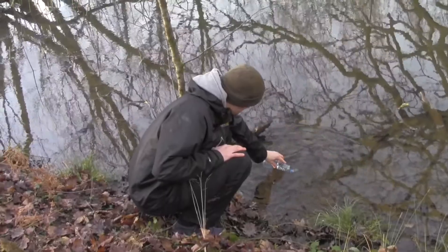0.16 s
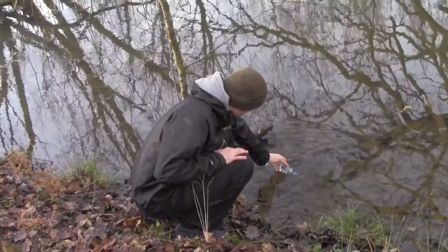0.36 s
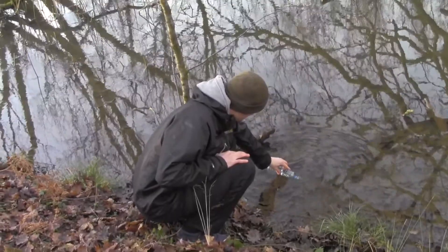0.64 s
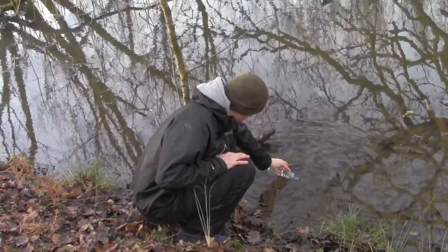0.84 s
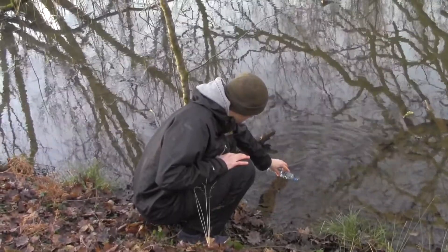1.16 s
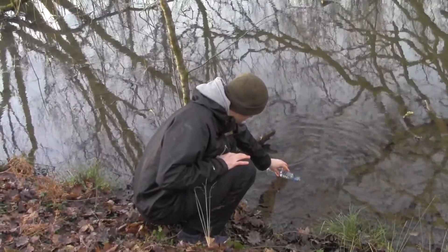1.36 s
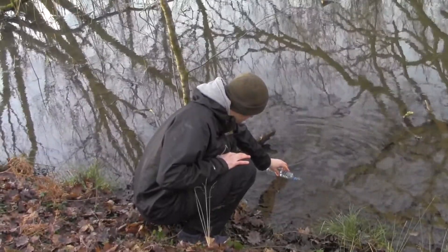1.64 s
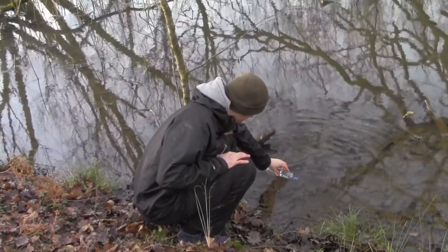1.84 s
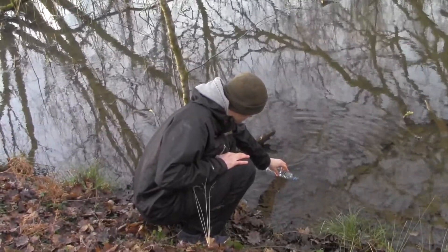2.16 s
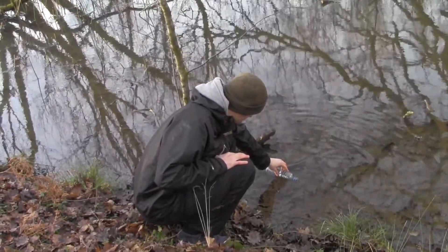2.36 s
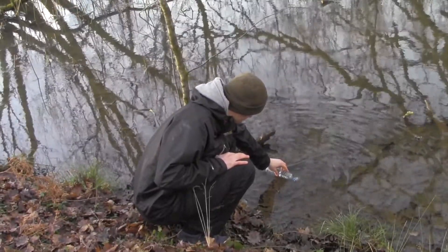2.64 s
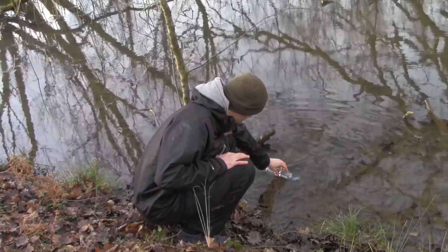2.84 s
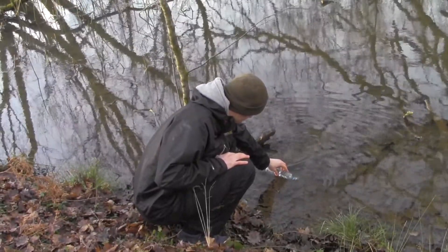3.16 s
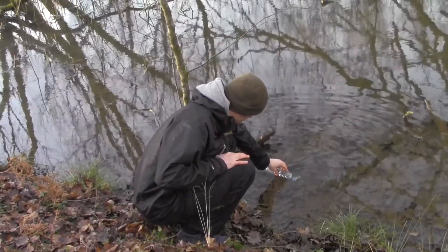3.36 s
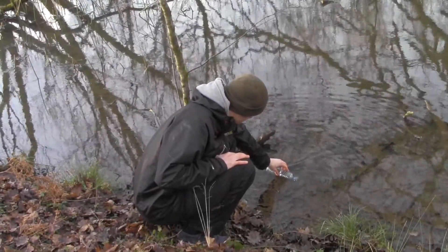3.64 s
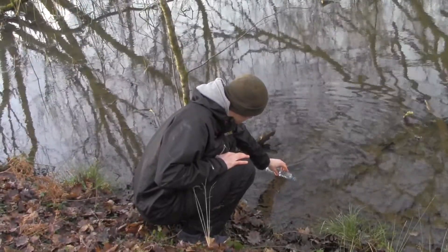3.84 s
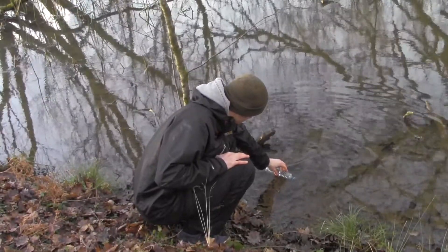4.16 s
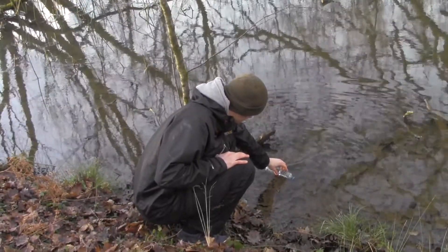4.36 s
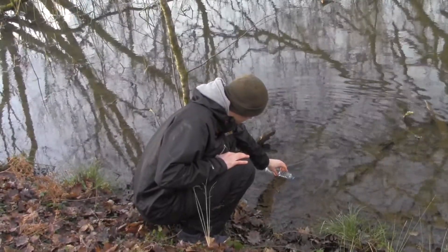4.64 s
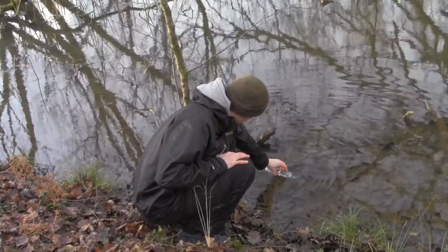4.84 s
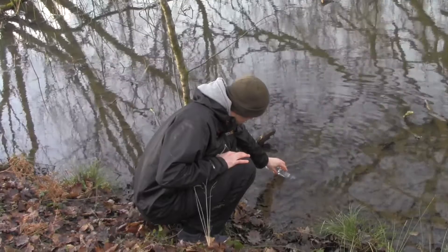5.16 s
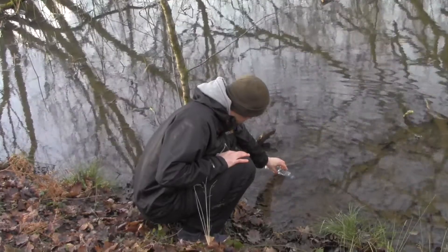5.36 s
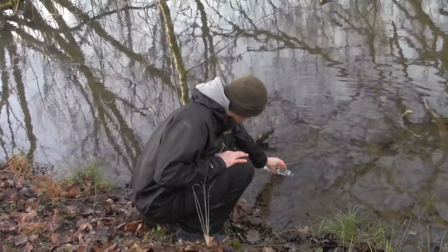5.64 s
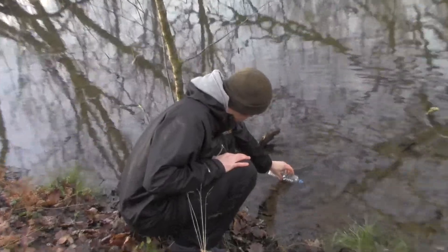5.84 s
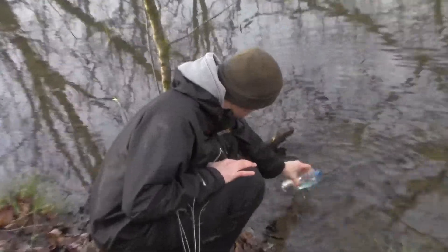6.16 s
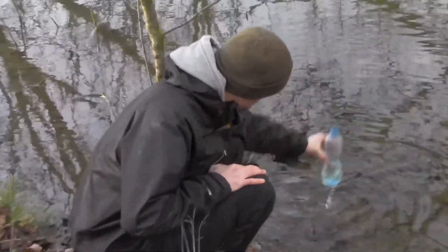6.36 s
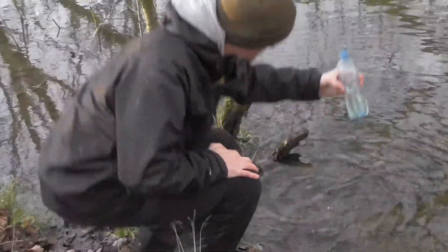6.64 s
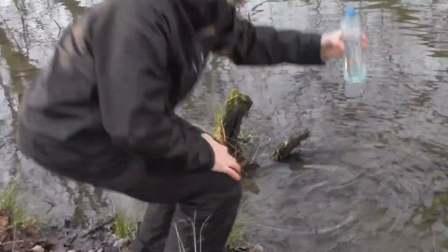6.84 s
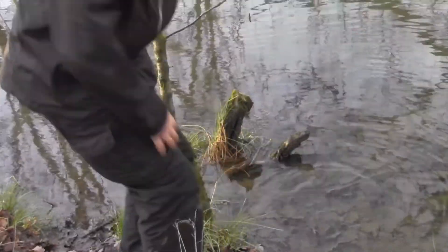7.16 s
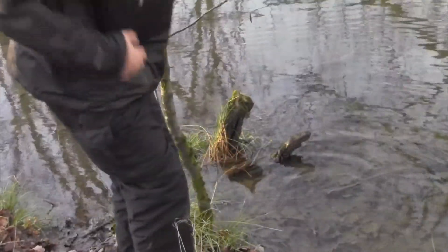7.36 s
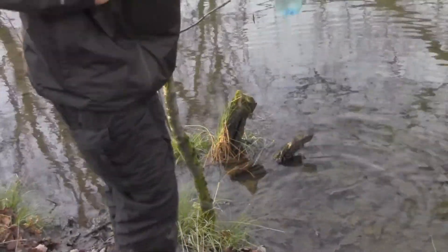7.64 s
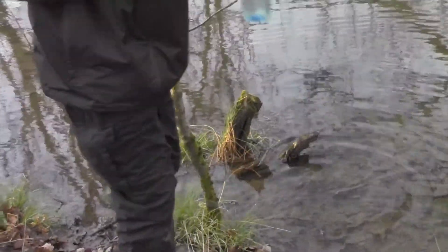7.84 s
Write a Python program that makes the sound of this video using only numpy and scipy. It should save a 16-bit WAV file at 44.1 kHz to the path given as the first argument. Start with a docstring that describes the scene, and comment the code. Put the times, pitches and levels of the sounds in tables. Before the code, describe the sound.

A quiet woodland pond outdoors, heard through an exposed stereo microphone over a faint, broad wash of distant air and traffic. From 0.3 to 1.1 seconds small dull wind puffs flutter on either side. A slight tick comes at 1.8, then more gusts from 2 to 2.7, with light nylon rustling and small ticks around 2.4. A brighter rustle and sharp ticks at 2.8 lead into heavy wind buffeting from 2.95 to 3.65, low, lumpy and booming. It stops quickly, with a brush of cloth at 3.75 and a small puff at 3.9. Calm follows, with sparse ticks, barely audible squeaks and weak thumps near 5.3 and 5.65. A faint plastic touch at 5.9 precedes a short bottle crackle and dent at 6.5. Clicks follow near 6.9. At 7.6 to 7.7 jacket fabric swishes around a crisp, bright snap, then the distant wash remains until 8.

```python
"""Wind buffets two microphone ports over a far wash of air and traffic; a nylon jacket rustles
and squeaks faintly, small things tick, and a plastic bottle crackles in the hand at a woodland pond.
Wind is shaped noise plus rounded pressure pops; the wash is noise in independently swelling bands.
Cloth and bottle are random slips through resonances; ticks are short rings; squeaks are gliding noise."""
import sys
import numpy as np
from scipy import signal
from scipy.io import wavfile
from scipy.ndimage import uniform_filter1d

SR = 44100
rng = np.random.default_rng(int(sys.argv[2]) if len(sys.argv) > 2 else 0)


def store_pcm(level_fs):
    """Save levels as 16-bit WAV."""
    pcm = np.round(np.clip(level_fs, -1, 1) * 32767).astype(np.int16)
    wavfile.write(sys.argv[1], SR, np.atleast_2d(pcm).T)


N = 352800

# Levels and sides in the tables are nominal, ahead of port mixing, filters and limiter.
# Running wind on the ports. Each row: time in seconds, level in dB, left minus right in dB,
# tilt in dB per octave.
BREEZE = [(0, -58, 0.5, 5), (.24, -57, 3, -20), (.6, -68, 6, -20), (.96, -72, 6, -6), (1.35, -66, 1.5, -12),
          (1.61, -57, 1.5, -11), (1.89, -64, 1.5, -12), (2.6, -72, -8, -15), (2.81, -62, -8, -20),
          (2.85, -39, -3, -16), (3.02, -21, -3, -9), (3.09, -14, -1.5, -10), (3.3, -12, -3, -7),
          (3.48, -18, -2.5, -3), (3.64, -28, .6, 4), (3.74, -50, .6, 5), (3.8, -90, 0, 3)]
# Short gusts. Each row: peak time in seconds, level in dB, rise in seconds per 20 dB,
# fall in seconds per 20 dB, left minus right in dB, tilt in dB per octave.
GUSTS = [(.322, -34, .035, .09, -3, -20), (.54, -45, .08, .08, 7, -26), (.736, -37, .04, .07, -10.5, -20),
         (.9, -51, .05, .06, 6, -20), (1.07, -58, .04, .06, 7, -12), (1.96, -46, .05, .06, 9, -22),
         (2.05, -33, .06, .12, -3, -17.5), (2.3, -37, .02, .15, -15, -11), (2.46, -22, .06, .066, -8, -2.5),
         (2.62, -35, .015, .09, -5, -13), (2.73, -38, .1, .04, -6, -14), (2.986, -11, .045, .04, 3, 1.5),
         (3.8, -40, .04, .03, .6, -2.5), (3.91, -27, .012, .045, .6, 4), (4.98, -61, .03, .05, .6, -9),
         (5.277, -46, .04, .04, .6, -3), (5.317, -32, .025, .07, .6, -6), (5.45, -52, .06, .1, .6, -1.5),
         (5.65, -31, .012, .05, .6, -8)]
# Further eddies popping on a port. Each row: start in seconds, pop level in dB,
# left minus right in dB, edge level in dB.
EDDY_POPS = [(0.472, -32, 19, -64), (2.017, -31, 20, -61), (2.335, -33.5, -18, -58), (2.445, -24, -9, -31),
             (2.968, -14, 14, -17), (3.048, -7, 6, -40), (3.095, -2.5, 1.5, -30), (3.132, -7, 14, -11),
             (3.174, .6, -3, -12), (3.276, .6, 10, 1.5), (3.295, .6, 10, -5), (3.313, .6, 5, -9),
             (3.372, -5, 0, -30), (3.425, -11, 16, -12), (3.458, -12, 22, -18), (3.474, -8, 0, -35),
             (3.524, -3, 5, -9), (3.548, -7, -3, -26), (3.56, -9, 0, -30), (3.583, -14, 0, -35),
             (3.622, -4, 3, -16), (5.366, -27, .6, -56)]
# Turbulence spectrum before tilt. Each row: frequency in Hz, density in dB per Hz.
EDDY_SPECTRUM = [(25, -38), (60, -25), (110, 6), (200, 11), (350, 5), (550, -27), (800, -68), (1300, -71)]
# Stereo width of the wind. Each row: time in seconds, gain of the side signal in dB.
WIND_WIDTH = [(0, -18), (.2, -12), (.28, 1.5), (1.1, -1.5), (1.35, -16), (1.85, -14), (1.93, 1.5),
              (3.47, .6), (3.62, -20), (3.9, -40), (8, -38)]
# Far wash. Each row: time in seconds, level in dB.
WASH_LEVEL = [(0, -64), (1.2, -65), (1.56, -60.5), (2.38, -59.5), (2.8, -53), (3.3, -55), (3.9, -54),
              (4.3, -55), (4.86, -58.5), (5.3, -56), (6.3, -55.5), (7.22, -55.5), (8, -52.5)]
# Wash spectrum. Each row: frequency in Hz, density in dB per Hz.
WASH_SPECTRUM = [(60, -26), (201, -16), (380, -8), (627, -10.5), (810, -1), (953, 1), (1260, 4),
                 (2100, -5.5), (3000, -16), (4320, -22.5), (13200, -33), (15500, -40)]
# Gain of the wash bands below 700 Hz. Each row: time in seconds, gain in dB.
WASH_BODY = [(4.8, -2), (5.4, 3)]
# Jacket strokes. Each row: peak time in seconds, level in dB, rise in seconds per 20 dB,
# fall in seconds per 20 dB, top end against the rest in dB.
STROKES = [(1.5, -63.5, .15, .6, -1.5), (1.78, -72, .3, .25, 2.5), (2.36, -65, .015, .3, -7),
           (2.416, -50, .02, .05, 5), (2.46, -60, .08, .14, -7), (2.69, -52, .07, .15, -15),
           (2.8, -51, .2, .1, -3), (2.846, -39, .025, .13, 3), (3.15, -67, .1, .12, -1.5),
           (3.44, -68, .035, .6, 3), (3.76, -52, .035, .17, -5), (3.9, -63, .2, .45, -9),
           (4.95, -64, .02, .05, 4), (7.3, -62, .12, .17, 1), (7.598, -49, .02, .2, 3),
           (7.67, -44, .14, .1, 1), (7.91, -67, .07, .1, 3)]
# Cloth resonances. Each row: frequency in Hz, width in Hz, level in dB.
CLOTH_MODES = [(3056, 1430, -3), (4970, 1350, 1), (6500, 2000, 3), (8820, 2800, 11), (11680, 2400, 2.5),
               (14200, 3900, 3.5)]
# Small ticks. Each row: start in seconds, level in dB, pitch in Hz.
TICKS = [(1.8025, -36, 5000), (2.3595, -50, 10100), (2.4009, -40.5, 4330), (2.4157, -37.5, 4570),
         (2.416, -38, 13500), (2.432, -44, 13000), (2.632, -46, 5600), (2.6808, -30, 3090),
         (2.701, -38, 5600), (2.829, -21, 9000), (2.843, -23, 6500), (2.89, -42, 12000), (3.082, -41, 1550),
         (3.1268, -46, 6830), (4.132, -48, 1900), (4.489, -43, 8700), (4.675, -58, 9400),
         (5.1684, -39, 4780), (5.4979, -52, 5430), (6.3772, -46, 3980), (6.4423, -42, 3350),
         (6.537, -28, 2050), (6.847, -43.5, 4300), (6.8758, -30, 2880), (6.894, -42, 2900),
         (7.667, -18, 5500), (7.668, -34, 2800), (7.6685, -26, 9000), (7.676, -29, 6000),
         (7.684, -27, 6200), (7.701, -34, 6000)]
# Gliding squeaks. Each row: start in seconds, length in seconds, first pitch in Hz,
# last pitch in Hz, level in dB.
SQUEAKS = [(2.08, .21, 7550, 6650, -83), (3.6, .09, 7100, 7000, -68), (4.56, .15, 2950, 2900, -76),
           (5.1, .11, 7400, 6650, -79), (5.2, .2, 7000, 8300, -82), (6.385, .03, 3200, 3150, -62),
           (6.478, .02, 3300, 3250, -52), (6.9, .18, 6800, 7600, -79)]
# Grips on the bottle. Each row: start in seconds, length in seconds, level in dB,
# low modes against the rest in dB.
GRIPS = [(5.908, .05, -47, 6), (6.478, .02, -50, -8), (6.497, .025, -50, 12), (6.527, .011, -33, -9),
         (6.55, .022, -46, -2)]
# Bottle wall modes, lowest first. Each row: frequency in Hz, width in Hz, level in dB.
BOTTLE_MODES = [(960, 200, -9), (1450, 55, 8.5), (2000, 250, -9), (2800, 200, 5), (3300, 180, 6),
                (4950, 250, 14), (6000, 400, 12), (6980, 300, 5), (8800, 500, 9), (9900, 300, 2),
                (11500, 500, 3)]
# Dents snapping in. Each row: start in seconds, peak in dB.
DENTS = [(6.5105, -19), (6.5165, -26)]

# Opening pop of each gust: lead on the gust peak, level over the gust, edge level against the pop.
GUST_POP_LEAD_S, GUST_POP_DB, GUST_EDGE_DB = .009, 11, -48
# Pop pitch at zero tilt, and its rise with wind tilt.
POP_BASE_HZ, POP_OCTAVES_PER_TILT_DB = 295, .042
GRIP_RISE_S_PER_20DB, GRIP_FALL_S_PER_20DB = .014, .035
LIMIT_DB, RELEASE_DB_PER_S, ATTACK_S = -6.5, 80, .014
TOP_STOP_HZ = 16600


def amp(db):
    """dB to gain."""
    return 10 ** (np.asarray(db) / 20)


def unit(x):
    """Scale to rms 1."""
    return x / np.sqrt(np.mean(x ** 2) + 1e-20)


def sides(pan_db):
    """Left and right gains from left minus right in dB."""
    return amp(np.array([pan_db / 2, -pan_db / 2]))


def along(tables):
    """Interpolate timed columns per sample; the first, in dB, becomes gain and is silent off the tables."""
    t = np.arange(N) / SR
    s, *columns = np.transpose(np.concatenate(tables))
    columns = [np.interp(t, s, column) for column in columns]
    inside = sum((t >= rows[0][0]) & (t <= rows[-1][0]) for rows in tables)
    gate = uniform_filter1d(1. * inside, size=400)
    return [gate * amp(columns[0])] + columns[1:]


def drift(rate_hz):
    """Random control of rms about 1: noise through a two-pole low-pass at every 16th sample."""
    r = np.exp(-2 * np.pi * rate_hz * 16 / SR)
    noise = rng.standard_normal((N + SR) // 16 + 2)
    slow = signal.lfilter([1], [1, -2 * r, r * r], noise)[SR // 16:]   # settled part
    return np.interp(np.arange(N) / 16, np.arange(len(slow)), unit(slow))


def swells(s, db, rise_s, fall_s, hold_s=0):
    """Event gains, one row each: rise to s, hold, fall, in straight dB lines (seconds per 20 dB)."""
    t = np.arange(N, dtype=np.float32) / SR - np.asarray(s, np.float32)[:, None]
    away = np.maximum(-t / np.c_[rise_s], (t - np.c_[hold_s]) / np.c_[fall_s])
    return amp(np.c_[db] - 20 * np.clip(away, 0, 6))


def blend(gains, values):
    """Power-weighted mean of the values: louder events dominate."""
    weighted = sum(g ** 2 * v for g, v in zip(gains, values))
    return weighted / (np.sum(np.square(gains), axis=0) + 1e-30)


def colour(source, spectrum):
    """Yield half-octave bands of source(), weighted by the spectrum, with centres in Hz."""
    hz, db = np.transpose(spectrum)
    octaves = np.log2(min(hz[-1], SR * .45) / hz[0])
    edges_hz = hz[0] * 2 ** np.arange(0, octaves, .5)
    for low_hz, high_hz in zip(edges_hz, edges_hz[1:]):
        centre_hz = np.sqrt(low_hz * high_hz)
        sos = signal.butter(2, [low_hz, high_hz], "band", fs=SR, output="sos")
        band = signal.sosfilt(sos, source())
        yield amp(np.interp(np.log(centre_hz), np.log(hz), db)) * band, centre_hz


def resonate(x, hz, width_hz):
    """Two-pole resonance, peak gain 1."""
    r = np.exp(-np.pi * width_hz / SR)
    zeros = np.array([1, 0, -1]) * (1 - r * r) / 2
    return signal.lfilter(zeros, [1, -2 * r * np.cos(2 * np.pi * hz / SR), r * r], x + 1e-18)


def grains(per_s, spread_db):
    """Random clicks of uneven size and sign, rms 1."""
    sizes = amp(spread_db * np.minimum(rng.exponential(1, N), 5)) * rng.choice([-1, 1], N)
    return unit(sizes * (rng.random(N) < per_s / SR))


def wind_controls():
    """Breeze and gust gains add; the louder sets side and tilt."""
    level, pan_db, tilt_db = along([BREEZE])
    s, db, rise_s, fall_s, gust_pan_db, gust_tilt_db = np.transpose(GUSTS)
    gusts = uniform_filter1d(swells(s, db, rise_s, fall_s), size=500)   # rounded tops
    gains = [level, *gusts]
    return sum(gains), blend(gains, [pan_db, *gust_pan_db]), blend(gains, [tilt_db, *gust_tilt_db])


def pops(tilt_db, cycles=0.9, edge_hz=650, floor_hz=90):
    """Eddies hit a port as short rounded pressure lumps with a brighter edge; brighter wind pops higher."""
    out, t = np.zeros((2, N + 2000)), np.arange(2000) / SR
    edge = np.exp(-t * edge_hz / 0.79) * np.sin(2 * np.pi * edge_hz * t)
    rows = []
    for s, gust_db, _, _, pan_db, _ in GUSTS:
        pop_db = gust_db + GUST_POP_DB
        rows.append((s - GUST_POP_LEAD_S, pop_db, pan_db, pop_db + GUST_EDGE_DB))
    rows += [tuple(row) for row in EDDY_POPS]
    for (s, db, pan_db, edge_db), sign in zip(rows, rng.choice([-1, 1], len(rows))):
        start = round(s * SR)
        hz = POP_BASE_HZ * 2 ** (POP_OCTAVES_PER_TILT_DB * tilt_db[start])
        age = t * hz / cycles
        lump = age ** 2 * np.exp(2 - 2 * age) * np.sin(2 * np.pi * hz * t)
        facing = sign * sides(pan_db)
        out[:, start:start + 2000] += facing[:, None] * (amp(db) * lump + amp(edge_db) * edge)
    out[1] = np.roll(out[1], 60)   # eddies reach the right port 60 samples later
    return signal.sosfilt(signal.butter(2, floor_hz, "high", fs=SR, output="sos"), out[:, :N])


def wind(lumpy_db=5.0, top_hz=900):
    """Separate lumpy turbulence on each port, tilted over time, plus pops; a foam cover dulls it all."""
    level, pan_db, tilt_db = wind_controls()
    lumps = amp(lumpy_db * np.array([drift(37), drift(32)]))
    turbulence = lumps * rng.standard_normal((2, N))
    bands = list(colour(lambda: turbulence, EDDY_SPECTRUM))
    rms = np.sqrt(np.mean(sum(band for band, hz in bands) ** 2))
    tilted = sum(band * amp(tilt_db * np.log2(hz / 200)) for band, hz in bands) / rms
    ports = level * sides(pan_db) * tilted + pops(tilt_db)
    ports = ports - .22 * ports[::-1]   # stereo matrix partly opposes the ports
    mid = (ports[0] + ports[1]) / 2
    side = (ports[0] - ports[1]) / 2 * along([WIND_WIDTH])[0]
    stereo = np.array([mid + side, mid - side])
    return signal.sosfilt(signal.butter(6, top_hz, fs=SR, output="sos"), stereo)


def wash(patchy_db=1.9, brightening=.2):
    """Far air and traffic: mono noise whose bands swell and flicker separately; louder is brighter."""
    level = along([WASH_LEVEL])[0]
    body_gain = amp(np.interp(np.arange(N) / SR, *np.transpose(WASH_BODY)))
    total = np.zeros(N)
    for band, hz in colour(lambda: rng.standard_normal(N), WASH_SPECTRUM):
        if hz < 700:
            gain = body_gain
        else:
            gain = unit(level) ** (brightening * np.log2(max(hz / 1200, 1)))
        total += band * gain * amp(patchy_db * (drift(11) + drift(2.5)))
    return level * unit(total)


def hiss():
    """Faint steady noise above 3 kHz: a common part and a weaker opposed part."""
    sos = signal.butter(2, 3000, "high", fs=SR, output="sos")
    common, opposed = signal.sosfilt(sos, rng.standard_normal((2, N)))
    return amp(-83) * common + amp(-100) * opposed * [[1], [-1]]


def jacket(crease_width_hz=350, crease_db=5.0):
    """Fibres slip in dense grains; broad cloth resonances hold narrow ones that vary with the creases."""
    s, db, rise_s, fall_s, tops_db = np.transpose(STROKES)
    gains = swells(s, db, rise_s, fall_s)
    level, top_db = gains.sum(axis=0), blend(gains, tops_db)
    low, high = np.zeros(N), np.zeros(N)
    clumps = amp(2.2 * drift(45))
    for hz, width_hz, mode_db in CLOTH_MODES:
        slips = grains(3500, 4.2) * amp(2.5 * drift(25))
        broad = resonate(slips, hz, width_hz)
        creases = np.zeros(N)
        for offset in (-.45, 0, .4):   # in widths
            narrow = resonate(broad, hz + width_hz * offset, crease_width_hz)
            creases += amp(crease_db * drift(15)) * narrow
        part = low if hz < 8000 else high
        part += amp(mode_db) * (creases + .5 * resonate(broad, hz, width_hz))
    return level * clumps * (unit(low) + amp(top_db) * unit(high))


def ticks(cycles=7.0, tail_db=-11, tail_s=0.008, crack_db=-12):
    """A thin bright crack, a short ring at its own pitch, a narrow fizzing tail."""
    out, t = np.zeros(N + 4000), np.arange(4000) / SR
    fizz = rng.standard_normal((len(TICKS), 4000))
    for (s, db, hz), noise in zip(TICKS, fizz):
        crack = amp(crack_db) * np.exp(-t / 0.0005) * resonate(noise, 11000, 10000)
        ring = np.exp(-t * hz / cycles) * np.sin(2 * np.pi * hz * t)
        narrow = unit(resonate(resonate(noise, hz, hz * 0.4), hz, hz * 0.2))
        tail = amp(tail_db) * np.exp(-t / tail_s) * narrow
        onset = 1 - np.exp(-t * hz / 1.14)
        out[round(s * SR):][:4000] += amp(db) * (crack + onset * (ring + tail))
    return out[:N]


def squeaks(drift_hz=220, fade_s_per_20db=.02):
    """Narrow, broken noise modulating both phases of a gliding pitch."""
    t, out = np.arange(N) / SR, np.zeros(N)
    s, length_s, first_hz, last_hz, db = np.transpose(SQUEAKS)
    levels = swells(s, db, [fade_s_per_20db], [fade_s_per_20db], length_s)
    for k, level in enumerate(levels):
        hz = np.interp(t, [s[k], s[k] + length_s[k]], [first_hz[k], last_hz[k]])
        phase = 2 * np.pi * np.cumsum(hz) / SR
        out += level * (drift(drift_hz) * np.cos(phase) + drift(drift_hz) * np.sin(phase))
    return out * amp(4.5 * drift(27.3))


def wall(x, modes):
    """Sharp-skirted bottle wall modes in parallel, alternating in sign."""
    return sum((-1) ** k * amp(db) * resonate(resonate(x, hz, width_hz), hz, 3 * width_hz)
               for k, (hz, width_hz, db) in enumerate(modes))


def bottle():
    """Quick slips of the thin wall excite its modes; each dent gives a short low knock."""
    s, length_s, db, lows_db = np.transpose(GRIPS)
    gains = swells(s, db, [GRIP_RISE_S_PER_20DB], [GRIP_FALL_S_PER_20DB], length_s)
    level, low_db = gains.sum(axis=0), blend(gains, lows_db)
    slips = grains(9000, 1.5) * amp(0.97 * drift(60))
    low_modes = [mode for mode in BOTTLE_MODES if mode[0] < 2600]
    high_modes = [mode for mode in BOTTLE_MODES if mode[0] >= 2600]
    high = sum(amp(4.0 * drift(14)) * wall(slips, [mode]) for mode in high_modes)
    out = level * (unit(high) + amp(low_db) * unit(wall(slips, low_modes)))
    # a hard squeeze crunches between the modes
    out += level ** 2 / level.max() * amp(-3) * unit(resonate(slips, 2600, 3500))
    impulse = np.eye(1, 3000)[0]
    knock = wall(impulse, [(hz, 1.4 * width_hz, 0) for hz, width_hz, _ in BOTTLE_MODES[:4]])
    for s, peak_db in DENTS:
        out[round(s * SR):][:3000] += amp(peak_db) * knock / np.abs(knock).max()
    return out


def limiter(x):
    """Peaks over the limit pull both gains down, smoothed over the attack; release is steady in dB."""
    over_db = np.maximum(20 * np.log10(np.abs(x).max(axis=0) + 1e-9) - LIMIT_DB, 0)
    release_db = RELEASE_DB_PER_S * np.arange(N) / SR
    held_db = np.maximum.accumulate(over_db + release_db) - release_db
    return x * amp(-uniform_filter1d(held_db, size=max(round(ATTACK_S * SR), 1)))


def scene():
    """Near sounds sit almost in the middle, with a faint 23-sample echo opposed between the sides."""
    near = jacket() + ticks() + squeaks() + bottle()
    echo = amp(-14) * np.roll(near, 23) * [[1], [-1]]
    return wind() + wash() + hiss() + near * sides(.8)[:, None] + echo


def record(dry):
    """High-pass the deepest rumble, limit the peaks, cut the top."""
    rumble_cut = signal.butter(3, 55, "high", fs=SR, output="sos")
    limited = limiter(signal.sosfilt(rumble_cut, dry))
    top_cut = signal.cheby2(14, 70, TOP_STOP_HZ, fs=SR, output="sos")
    return signal.sosfilt(top_cut, limited)


dry = scene()
out = record(dry)
store_pcm(out)
```